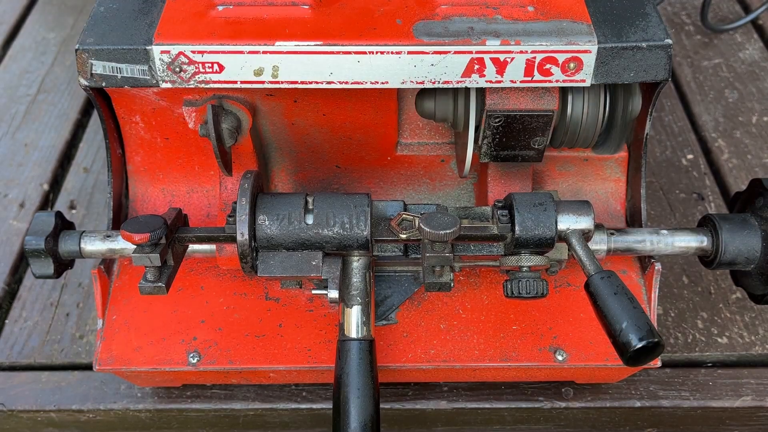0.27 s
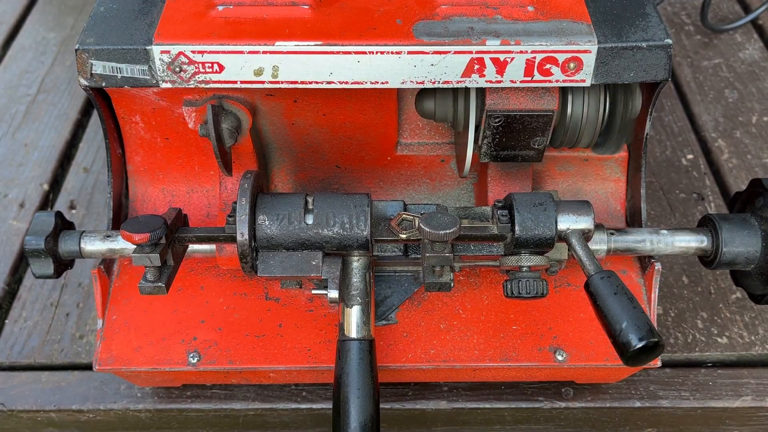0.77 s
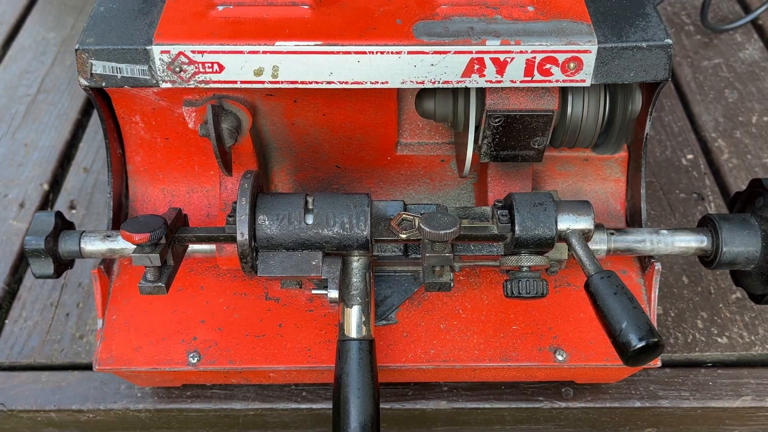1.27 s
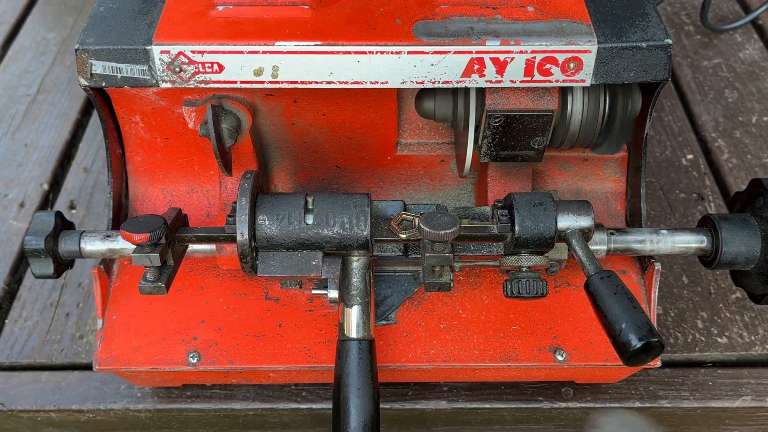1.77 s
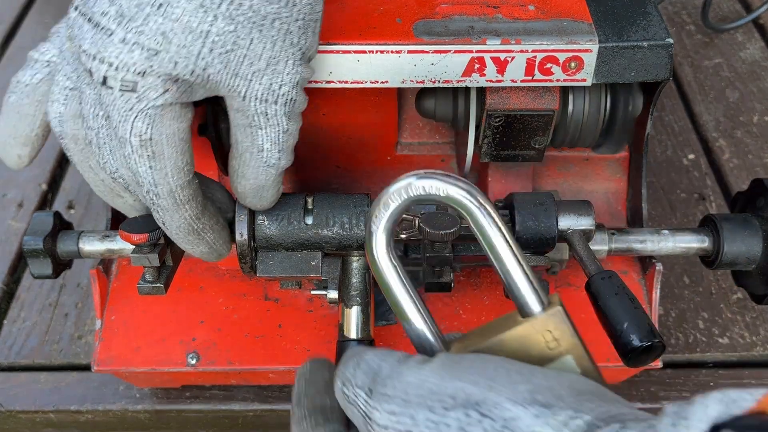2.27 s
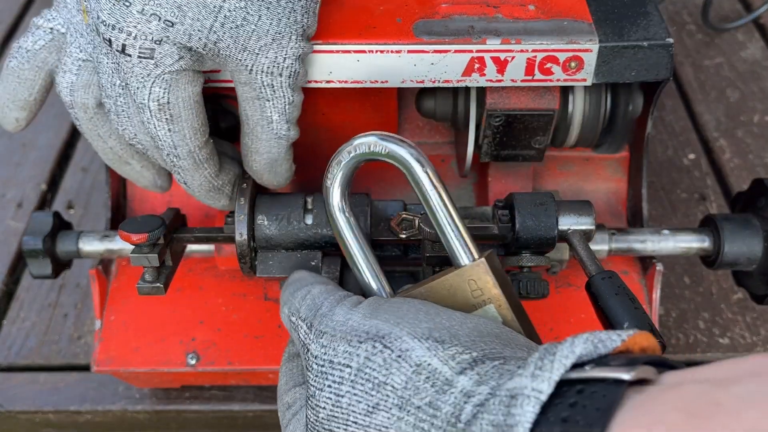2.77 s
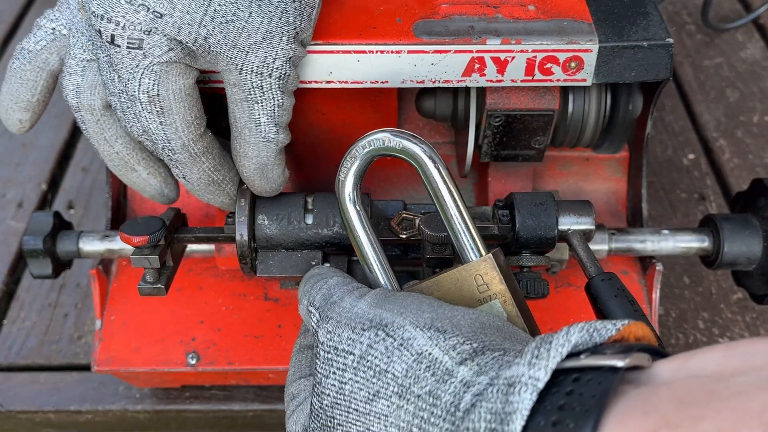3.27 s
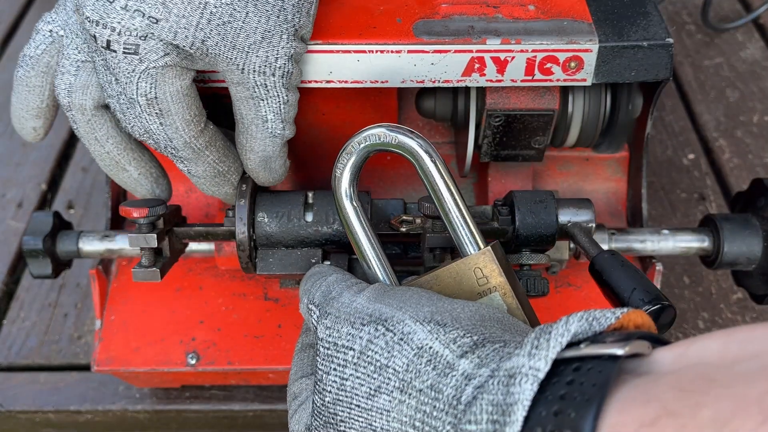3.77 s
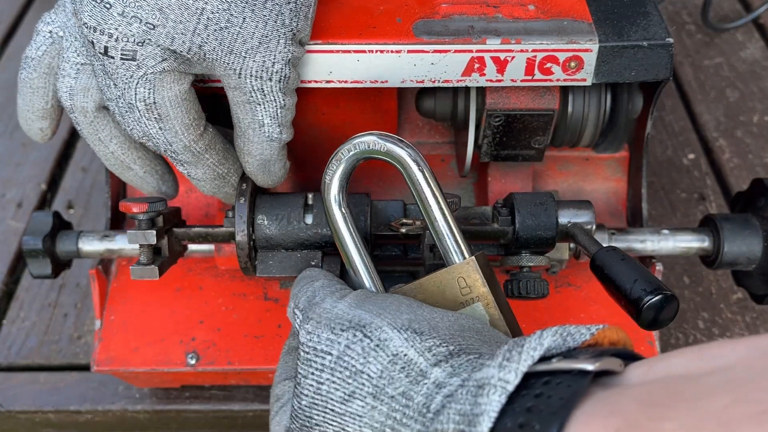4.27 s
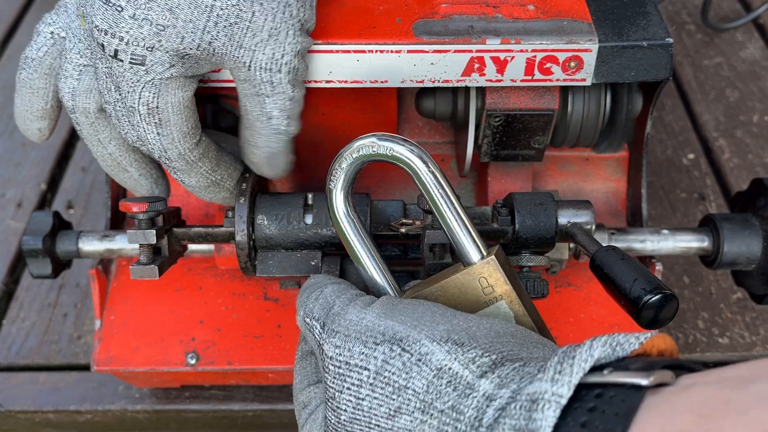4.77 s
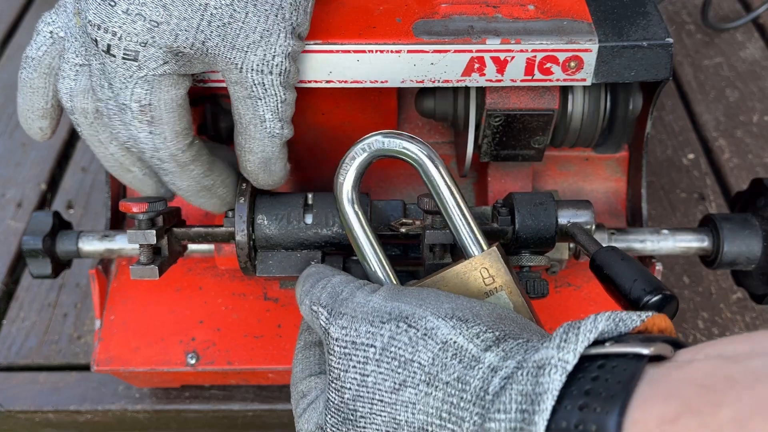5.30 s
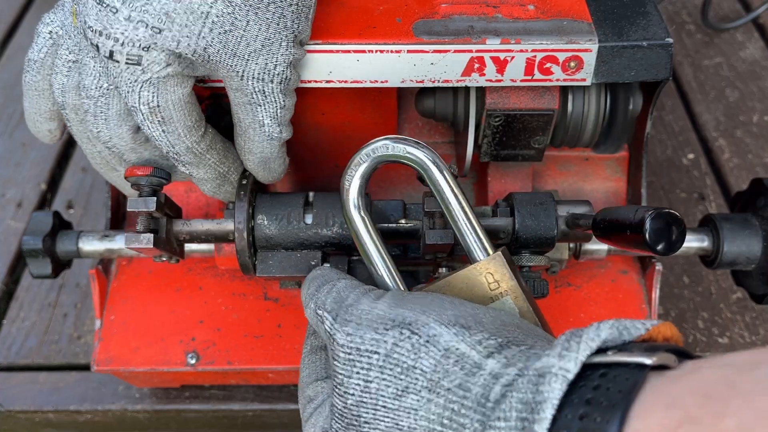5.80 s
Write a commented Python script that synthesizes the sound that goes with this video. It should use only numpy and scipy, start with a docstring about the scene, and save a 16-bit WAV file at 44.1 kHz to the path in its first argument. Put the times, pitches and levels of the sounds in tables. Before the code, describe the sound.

Close, low machine hum pulsing about ten times a second with loose rattling, sparse metallic ticks clustering early on, and faint dull knocks near the end.

```python
"""A key cutting machine idles on a wooden deck for six seconds, while a padlock and the carriage are handled.
From the start the motor is a sum of tones, the bearings are filtered noise, and the belt's tugs swell
a pulse train and rubbing noise that ring the housing, over a boom; the first clicks are decaying modes.
Clicks and scrapes (sparse catches, filtered) crowd near 1.6 s with a soft low thud, the upper housing
swells near 2.45 s, and two dull carriage knocks, decaying sines, sound near 5.7 s."""
import sys
import numpy as np
from scipy import signal
from scipy.fft import rfft, irfft
from scipy.io import wavfile
from scipy.ndimage import uniform_filter1d

SR = 44100
rng = np.random.default_rng(int(sys.argv[2]) if len(sys.argv) > 2 else 0)


def persist_wave(psi):
    """Save psi, clipped to +-1, as 16-bit WAV."""
    counts = np.round(np.clip(psi, -1, 1) * 32767).astype(np.int16)
    wavfile.write(sys.argv[1], SR, np.atleast_2d(counts).T)


N = 266364
T = np.arange(N) / SR  # seconds
F = np.maximum(np.fft.rfftfreq(N, 1 / SR), 1)  # Hz, kept above zero

# Spectrum of the bearing hiss. Each row: frequency in Hz, relative density in dB per Hz.
HISS_SPECTRUM = [(22, -27), (38, 0.5), (100, 11.5), (170, 8.5), (270, 1.5), (560, 7), (1100, -4.5),
                 (1650, -13.5), (2050, -22.5), (2900, -18.5), (4600, -30.5), (5900, -27), (6700, -37.5),
                 (8000, -29.5), (11200, -36.5), (15500, -45)]
# Mean level of the bearing hiss. Each row: time in seconds, level in dB.
HISS_LEVEL = [(0, -39), (.6, -41.5), (2.2, -42.5), (3, -45), (6.04, -44)]
# Mean level of the brightest hiss. Each row: time in seconds, level in dB.
TREBLE_LEVEL = [(0, -66), (.7, -80.5), (1.4, -71), (1.9, -86), (6.04, -78)]
# Ringing of the cutter and pulleys. Each row: frequency in Hz, width of one filter pass in Hz, mean level in dB.
CUTTER_MODES = [(1482, 55, -65), (1799, 12, -68), (2013, 270, -62), (2950, 110, -73.5), (3586, 59, -73),
                (3787, 200, -73)]

# Dull knocks of the carriage. Each row: start in seconds, level in dB before decay and panning, pitch in Hz.
CARRIAGE_KNOCKS = [(5.653, -32, 690), (5.843, -28.5, 730)]
KNOCK_T60_S = 0.096

# Metal clicks. Each row: start in seconds, tick level in dB and main mode level in dB (both before decay),
# body pitch in Hz.
METAL_CLICKS = [(0.154, -44.5, -41.5, 3190), (0.166, -53, -48, 2860), (0.3405, -53, -38.5, 1740),
                (0.3404, -64, -48.5, 2950), (0.3405, -55, -43, 5200), (1.536, -56, -37.5, 5170),
                (1.5395, -55, -33, 1900), (1.542, -49, -36, 2680), (1.549, -48, -47, 2000),
                (1.5737, -58, -39, 1820), (1.576, -58, -47, 2350), (1.585, -70, -39, 1400),
                (1.6328, -35, -48, 4380), (1.642, -62, -37, 1530), (1.652, -66, -38, 1720),
                (1.944, -58, -39.5, 1950), (2.042, -74, -40.5, 1410), (2.115, -54, -42, 1840),
                (2.187, -68, -41.5, 1740), (2.32, -58, -46, 1880), (3.068, -71, -48, 3280),
                (3.092, -78, -47.5, 2580), (4.6723, -53, -53, 2480), (5.653, -53, -48, 2180)]
# Spectrum of a click's tick. Each row: frequency in Hz, relative density in dB per Hz.
TICK_SPECTRUM = [(1500, -8), (3500, -13), (5100, 2.5), (6200, 4), (8300, 1.5), (10500, -0.5), (12500, -9),
                 (14500, -2), (16000, -6)]
# Ring time of a click at 2 kHz; with a positive slope, higher bodies stop sooner.
CLICK_T60_S, CLICK_T60_SLOPE, TICK_T60_S = 0.023, 1, .009
# Second mode (pitch ratio, dB against the first), clatter of weaker modes (dB, width as a share of pitch).
SECOND_MODE, SECOND_MODE_DB, CLATTER_DB, CLATTER_WIDTH = 1.28, -7, -4, .55
# Sliding contacts. Each row: centre in seconds, rasp gain in dB, hiss gain in dB, Gaussian spread in seconds.
SLIDES = [(1.28, -57, -62, 0.018), (1.52, -46, -54.5, .004), (1.54, -44, -53, .007),
          (1.568, -45.5, -62, 0.016), (1.631, -49, -48, 0.0023), (1.645, -60, -65, .014),
          (1.682, -50.5, -69, 0.011), (1.93, -48.5, -74, 0.0092), (2.146, -59, -55.5, 0.0089),
          (2.34, -54, -61, 0.009), (2.53, -60, -66, 0.023), (2.928, -64, -67, 0.014),
          (3.302, -49.5, -59, .003), (3.32, -52, -62, 0.007), (3.51, -49.5, -59.5, 0.014),
          (5.07, -62, -65, 0.008), (5.655, -59, -70, 0.01)]
CATCHES_PER_S = 1300  # mean rate in each of the two noises

# Hum and whine of the motor. Each row: time in seconds, hum level in dB, whine level in dB, both before trim.
MOTOR_LEVELS = [(0.1, -32, -52), (0.23, -32, -48.5), (0.78, -33, -50.5), (2.87, -33, -50.5),
                (3.28, -33, -46.5), (4.89, -33.5, -51), (5.44, -33, -46), (5.85, -33, -51),
                (5.95, -32.5, -49.5)]
# Weaker motor tones. Each row: frequency in Hz, mean level in dB, left minus right in dB.
MOTOR_TONES = [(299.4, -53, 0), (309.6, -57, 3), (399.1, -50.5, 0), (445.5, -57, -2), (545.5, -62, -3),
               (645.3, -50, -5), (669.9, -55, -9), (744.9, -58, -9), (898, -66, -8), (1090.8, -66, -3),
               (1215.3, -59, 3), (1290.3, -63.5, -3), (1390.2, -67, -8), (1760.3, -70.5, 6),
               (2065.5, -66, 0), (2826, -77, 0), (2926.5, -76, -5)]
HUM_HZ, WHINE_HZ = 99.85, 1190.4
HUM_TRIM_DB, WHINE_TRIM_DB = 2.13, 4

# Tugs of the belt. Each row: time in seconds, housing rumble in dB, base boom in dB before trim.
BELT_TUGS = [(0.121, -45, -39.5), (0.205, -40.5, -34), (0.367, -36, -34), (0.456, -36, -35),
             (0.6, -36.5, -36.5), (0.686, -38, -38.5), (0.764, -36.5, -34.5), (0.881, -41.5, -38),
             (0.95, -32.5, -32), (1.063, -36.5, -41.5), (1.177, -36, -36.5), (1.343, -31, -31.5),
             (1.446, -39, -37), (1.53, -33, -34.5), (1.64, -34.5, -38.5), (1.762, -34.5, -32.5),
             (1.845, -38, -49.5), (1.922, -34, -32), (2.029, -38.5, -34), (2.131, -35, -33.5),
             (2.255, -38, -37.5), (2.323, -34, -31.5), (2.427, -36.5, -43), (2.515, -31.5, -32),
             (2.604, -37, -34), (2.741, -32, -33), (2.839, -37, -43.5), (2.908, -35, -34),
             (3.004, -36.5, -41.5), (3.098, -39, -38), (3.216, -35.5, -36.5), (3.308, -39.0, -37),
             (3.4, -34.5, -37), (3.488, -35.5, -34.5), (3.589, -41.5, -35.5), (3.773, -36.5, -34),
             (3.898, -36.5, -35.5), (3.997, -37.5, -41), (4.092, -35.5, -38), (4.171, -34.5, -37),
             (4.284, -41, -37), (4.372, -34.5, -45), (4.484, -36, -38), (4.58, -35, -40),
             (4.678, -35, -42.5), (4.752, -38, -39), (4.885, -34, -36.5), (5.07, -37.5, -35.5),
             (5.163, -37, -32.5), (5.264, -42, -39.5), (5.411, -36.5, -45), (5.474, -43, -39),
             (5.541, -41.5, -38), (5.657, -35, -40.5), (5.739, -37.5, -37), (5.854, -38.5, -37.5),
             (5.96, -36.5, -44.5)]
# Housing resonances. Each row: frequency in Hz, width of one filter pass in Hz, relative gain in dB,
# left minus right in dB.
HOUSING_MODES = [(319.5, 10.3, 4.5, 4), (370.4, 33, 11, .5), (408.2, 45, 9, -.5), (447.6, 18.7, 11.5, -4.5),
                 (486.8, 24.7, 6.5, -3), (633.6, 28, 2.5, -5), (681.3, 31.5, 5.5, -10),
                 (728.7, 32, 2.5, -15.5), (870, 73, -5.5, -18.5)]
# Spectrum of the rattle. Each row: frequency in Hz, relative density in dB per Hz.
RATTLE_SPECTRUM = [(500, -32), (900, 12), (1500, -6), (2800, -11), (5000, -28), (12000, -41)]
# Mean rattle level against the rumble. Each row: time in seconds, level in dB.
RATTLE_LEVEL = [(0, -11), (1.7, -9), (2.4, -10.5), (2.9, -10), (3.3, -13.5), (6.04, -12)]
# Turns of the belt per second, and a time at which its joint passes.
BELT_HZ, JOINT_S = 5.088, .36
# Gaussian rise and fall shared by every tug, and the peak quickening of the knocks at the strongest.
SURGE_ATTACK_S, SURGE_RELEASE_S, QUICKEN_HZ = 0.023, 0.024, 5.34
# Levels between the tugs, boom before trim; under 1, sharpness makes the boom swell and fade more slowly.
RUMBLE_REST_DB, BOOM_REST_DB, BOOM_SHARPNESS = -41, -42, 0.84
BOOM_TRIM_DB, BOOM_WAVER_DB = 1.84, 1.2
# Extra power of the swell per octave above 500 Hz.
BRIGHTEN = .45
# The upper housing resonances (600 to 800 Hz) swell once and ease.
UPPER_REST_DB, UPPER_SWELL_DB, UPPER_AT_S, UPPER_SPREAD_S = 0.5, 5, 2.45, 0.3
# The belt's rubbing against the knocks, and the lumpiness of both.
RUB_DB, LUMP_DB = -1, 3.5

# Phase by which the left port leads the right. Each row: frequency in Hz, phase in radians.
PORT_LEAD = [(140, -.71), (200, -.95), (300, -.25), (500, -.55), (620, .2), (730, .1), (950, 1.6),
             (1500, 0), (1800, -.3), (2500, .1), (3100, 1.3), (3800, .3), (5100, 0), (5600, -2.4),
             (8400, -6.2), (10200, -6.5), (15500, -12.5)]
TOP_HZ = 15800


def undb(db):
    """Amplitude ratio: decibels to gain."""
    return 10 ** (np.asarray(db) / 20)


def unit(x):
    """Normalization: scale to rms 1 over all channels."""
    return x / np.sqrt(np.mean(x ** 2))


def curve(rows, axis=1):
    """Linear interpolation: one column of a table, joined by straight lines in time."""
    rows = np.array(rows)
    return np.interp(T, rows[:, 0], rows[:, axis])


def pan(db):
    """Level stereophony: left and right gains for a level difference."""
    return undb(np.array([[db], [-db]]) / 2)


def colour(x, points):
    """Linear filtering by a spectrum of (Hz, dB) points, joined over log frequency."""
    hz, db = np.transpose(points)
    gain = undb(np.interp(np.log(F), np.log(hz), db))
    return irfft(rfft(x) * gain, N)


def ring(x, hz, width, order=1):
    """Damped resonance with gain 1 at its centre; order 2 passes it twice for steep skirts."""
    detuning = (F / hz - hz / F) * hz / width
    return irfft(rfft(x) / (1 + 1j * detuning) ** order, N)


def walk(rate):
    """Low-passed random fluctuation with rms 1; rate in Hz sets its speed."""
    smoothed = rfft(rng.standard_normal(N)) * np.exp(-(F / rate) ** 2)
    return unit(irfft(smoothed, N))


def ports(x, apart):
    """Partial coherence: two ports hear the first signal alike and the second in opposite phase."""
    return np.array([x[0] + apart * x[1], x[0] - apart * x[1]]) / np.hypot(1, apart)


def noise():
    """Statistical independence: two unrelated white noises."""
    return rng.standard_normal((2, N))


def swell(t, spread):
    """Gaussian envelope of height 1."""
    return np.exp(-.5 * ((T - t) / spread) ** 2)


def steady(x):
    """Power normalization over short spans evens out the strength; the fine grain stays."""
    size = int(.03 * SR)
    power = uniform_filter1d(np.mean(x ** 2, axis=0), size)
    return x / np.sqrt(uniform_filter1d(power, size))


def bearings():
    """Broadband excitation: rolling hiss, and noise that keeps the cutter and pulleys ringing."""
    hiss = unit(colour(ports(noise(), apart=0.5), HISS_SPECTRUM))
    hiss = hiss * undb(curve(HISS_LEVEL) + 1.26 * walk(31))
    bright = unit(ring(ports(noise(), apart=0.15), 8000, 8600, order=2))
    bright = bright * undb(curve(TREBLE_LEVEL) + 1.2 * walk(150))
    drive = ports(noise(), apart=0.28)
    ringing = 0
    for hz, width, db in CUTTER_MODES:
        mode = unit(ring(drive, hz, width, order=2))
        ringing = ringing + undb(db + 1.75 * walk(30)) * mode
    return hiss + bright + ringing


def bump():
    """Amplitude and phase modulation: a soft low thud near the sharpest click."""
    wave = np.sin(2 * np.pi * 36 * T + 0.73 * walk(15))
    return undb(-47.0) * swell(1.65, 0.13) * wave


def carriage():
    """Free decay of a struck mode: dull knocks of the carriage set a housing panel ringing."""
    out = 0
    for t, db, hz in CARRIAGE_KNOCKS:
        age = np.maximum(T - t, 0)
        decay = np.exp(-np.log(1000) * age / KNOCK_T60_S)
        build = 1 - np.exp(-hz * age / 2)
        out = out + undb(db) * np.sin(2 * np.pi * hz * age) * decay * build
    return np.sqrt(2) * pan(-7) * out


def clicks(bright, grain):
    """Modal impact: each contact is a bright tick over a briefly ringing body."""
    out = 0
    for t, tick_db, body_db, hz in METAL_CLICKS:
        body_t60 = CLICK_T60_S * (2000 / hz) ** CLICK_T60_SLOPE
        age = np.maximum(T - t, 0)
        body_decay = (T >= t) * np.exp(-np.log(1000) * np.minimum(age / body_t60, 10))
        tick_decay = (T >= t) * np.exp(-np.log(1000) * np.minimum(age / TICK_T60_S, 10))
        # two close modes over a clatter of weaker ones
        phase = 2 * np.pi * hz * age
        second = undb(SECOND_MODE_DB) * np.sin(SECOND_MODE * phase)
        clatter = undb(CLATTER_DB) * unit(ring(grain, hz, CLATTER_WIDTH * hz, order=2))
        body = np.sin(phase) + second + clatter
        # the modes take a moment to build up
        build = 1 - np.exp(-hz * age)
        tick = undb(tick_db) * tick_decay * bright
        out = out + tick + np.sqrt(2) * undb(body_db) * body_decay * build * body
    return out


def scuffs(bright, grain):
    """Stick-slip friction: sparse random catches give a rasp, with a soft hiss beside it."""
    catches = np.sign(grain) * (rng.random(N) < CATCHES_PER_S / SR)
    rasp = unit(ring(catches, 1710, 1700, order=2))
    hiss = ring(bright, 6300, 8000)
    slide = 0
    for t, rasp_db, hiss_db, spread in SLIDES:
        slide = slide + swell(t, spread) * (undb(rasp_db) * rasp + undb(hiss_db) * hiss)
    return slide * undb(3.5 * walk(180))


def handling():
    """Contact excitation: clicks and scuffs share the same noises."""
    bright = unit(colour(ports(noise(), apart=0.46), TICK_SPECTRUM))
    grain = ports(noise(), apart=0.47)
    return clicks(bright, grain) + scuffs(bright, grain)


def motor():
    """Periodic magnetic force: hum near twice the mains rate, slot whine and weaker wavering tones."""
    hum = np.sin(2 * np.pi * HUM_HZ * T) * undb(curve(MOTOR_LEVELS) + HUM_TRIM_DB)
    phase = 2 * np.pi * WHINE_HZ * T + 0.098 * walk(7.6)
    whine = np.sin(phase) * undb(curve(MOTOR_LEVELS, axis=2) + WHINE_TRIM_DB + 0.63 * walk(17))
    out = hum + whine
    for hz, db, side_db in MOTOR_TONES:
        level = undb(db + 2.5 * walk(13))
        phase = 2 * np.pi * hz * T + 0.55 * walk(7) + hz / 8000 * walk(60)
        out = out + pan(side_db) * level * np.sin(phase)
    return np.sqrt(2) * out  # a sine of rms 1


def surge(at_s):
    """Transient loading: one tug of the belt, height 1, with its own rise and fall."""
    age = T - at_s
    spread = np.where(age < 0, SURGE_ATTACK_S, SURGE_RELEASE_S)
    return np.exp(-.5 * np.minimum(np.abs(age) / spread, 10) ** 2)


def shaking():
    """Power addition of tugs: strengths of rumble and boom, and the cycles by which knocks run ahead."""
    rumble, boom, lead = undb(RUMBLE_REST_DB) ** 2, undb(BOOM_REST_DB) ** 2, 0
    hardest_db = max(row[2] for row in BELT_TUGS)
    for t, rumble_db, boom_db in BELT_TUGS:
        tug = surge(t)
        rumble = rumble + (undb(rumble_db) * tug) ** 2
        boom = boom + (undb(boom_db) * tug ** BOOM_SHARPNESS) ** 2
        # knocks lag before a tug's peak and lead after it, so they run quicker at the peak
        lead = lead + QUICKEN_HZ * undb(boom_db - hardest_db) * tug * (T - t)
    return np.sqrt(rumble), np.sqrt(boom), lead


def belt_rub(fresh, turns):
    """Periodic roughness: the belt's uneven surface comes round again, mixed with fresh noise."""
    surface = rng.standard_normal(int(turns * SR / BELT_HZ))
    return np.resize(surface, N) + fresh * rng.standard_normal(N)


def housing_ring(contact, rumble):
    """Forced resonance: knocks and rubbing ring the panels, more brightly when harder."""
    drive = ports([contact, rng.standard_normal(N)], apart=0.14) * undb(LUMP_DB * walk(53))
    upper_db = UPPER_REST_DB + UPPER_SWELL_DB * swell(UPPER_AT_S, UPPER_SPREAD_S)
    housing = 0
    for hz, width, db, side_db in HOUSING_MODES:
        # higher panels swell most, and each panel's share wanders
        brightness = unit(rumble) ** (BRIGHTEN * np.log2(hz / 500))
        share = undb(db + 1.5 * walk(20) + (600 < hz < 800) * upper_db)
        housing = housing + pan(side_db) * brightness * share * ring(drive, hz, width, order=2)
    return steady(housing)


def base_boom(cycle, rub):
    """Harmonic excitation: the base booms at the second harmonic of the knocks, with a rubbing drone."""
    drone = unit(ring(ports([rub, rng.standard_normal(N)], apart=0.16), 207.9, 24, order=2))
    base = steady(np.sqrt(2) * np.sin(2 * cycle) + 0.69 * drone)
    return base * undb(BOOM_WAVER_DB * walk(26))


def thin_rattle(rub, turn):
    """Cyclic modulation: rubbing noise is strengthened as the belt's joint passes."""
    rattle = unit(colour(ports([rub, rng.standard_normal(N)], apart=0.51), RATTLE_SPECTRUM))
    return rattle * undb(curve(RATTLE_LEVEL) + 1.6 * np.cos(turn))


def belt():
    """Parametric excitation: loose parts knock once per hum cycle, harder and quicker at each tug."""
    rumble, boom, lead = shaking()
    # the belt's stiff joint runs over two pulleys on each turn
    turn = 2 * np.pi * BELT_HZ * (T - JOINT_S)
    cycle = 2 * np.pi * (HUM_HZ * T + lead)
    cycle = cycle + 0.22 * np.sin(2 * turn) + 0.17 * np.sin(turn) + 0.3 * walk(17)
    # a narrow pulse at the top of each cycle
    knocks = np.exp(45 * (np.cos(cycle + .13 * walk(50)) - 1)) * undb(2.5 * walk(90))
    # belt and pulleys line up again every third turn
    rub = unit(belt_rub(fresh=.5, turns=1) + 1.4 * belt_rub(fresh=.4, turns=3))
    contact = unit(ring(knocks, 502, 1400)) + undb(RUB_DB) * rub
    housing = housing_ring(contact, rumble)
    base = base_boom(cycle, rub)
    rattle = thin_rattle(rub, turn)
    return rumble * (housing + rattle) + undb(BOOM_TRIM_DB) * pan(-1.7) * boom * base


def scene():
    """Superposition: the idling machine and the handling of its parts."""
    return bearings() + bump() + carriage() + handling() + motor() + belt()


def record(dry):
    """Two-port reception: short end fades, a phase difference between ports, and a steep top cut."""
    left, right = dry * np.clip(np.minimum(T, T[-1] - T) / .004, 0, 1)
    hz, radians = np.transpose(PORT_LEAD)
    lag = np.exp(-1j * np.interp(F, hz, radians))
    heard = np.array([left, irfft(rfft(right) * lag, N)])
    top_cut = signal.ellip(8, .2, 70, TOP_HZ, fs=SR, output="sos")
    return signal.sosfilt(top_cut, heard)


dry = scene()
out = record(dry)
persist_wave(out)
```